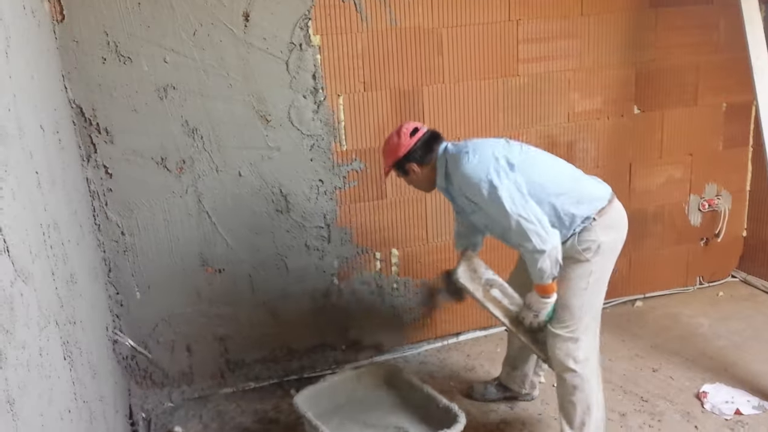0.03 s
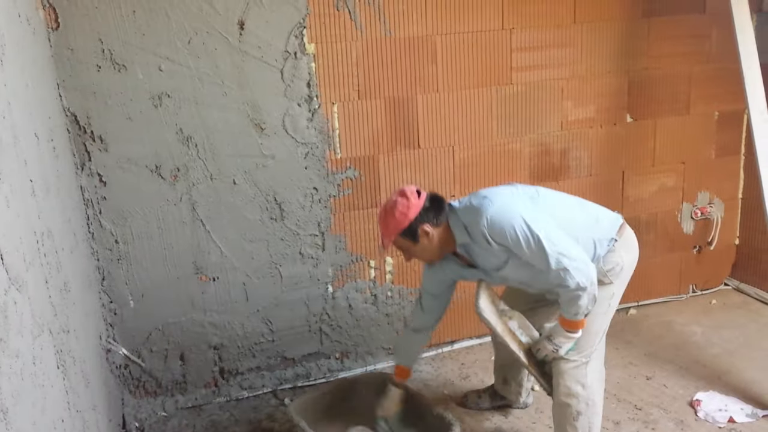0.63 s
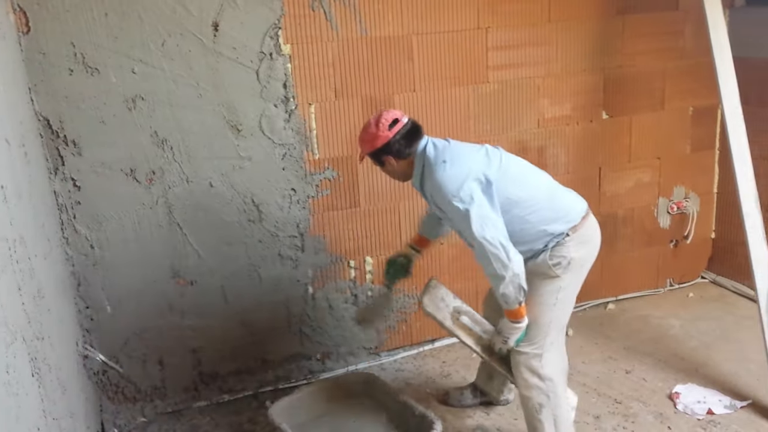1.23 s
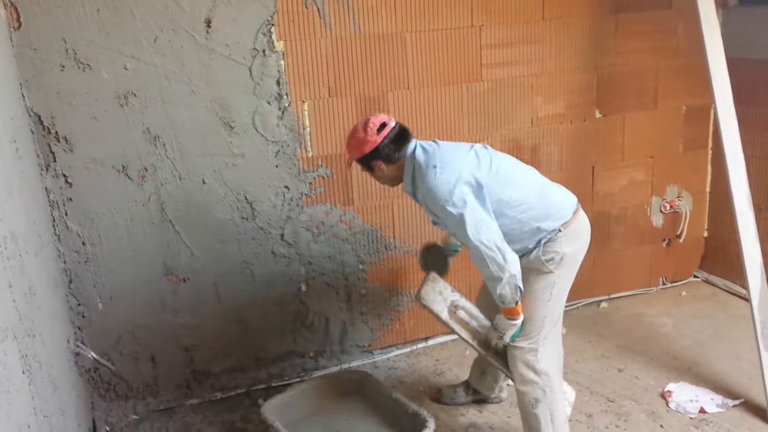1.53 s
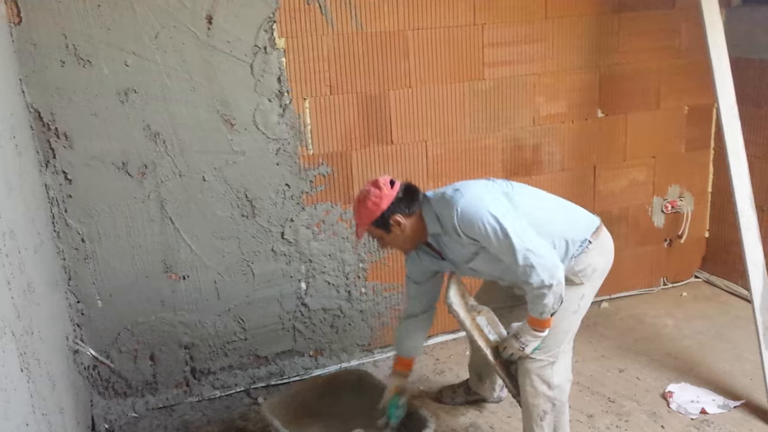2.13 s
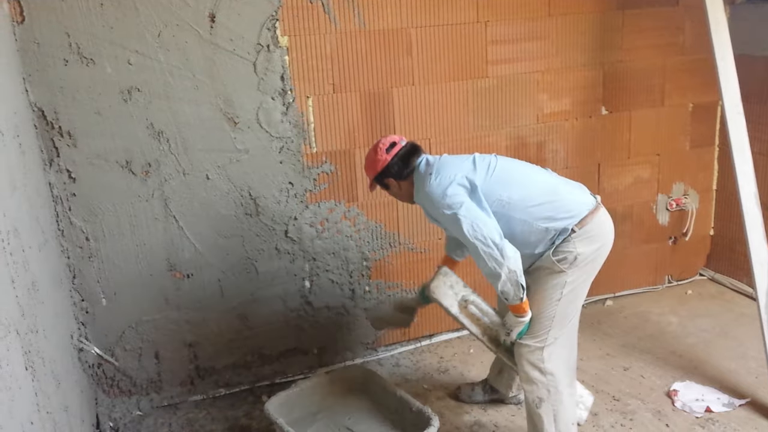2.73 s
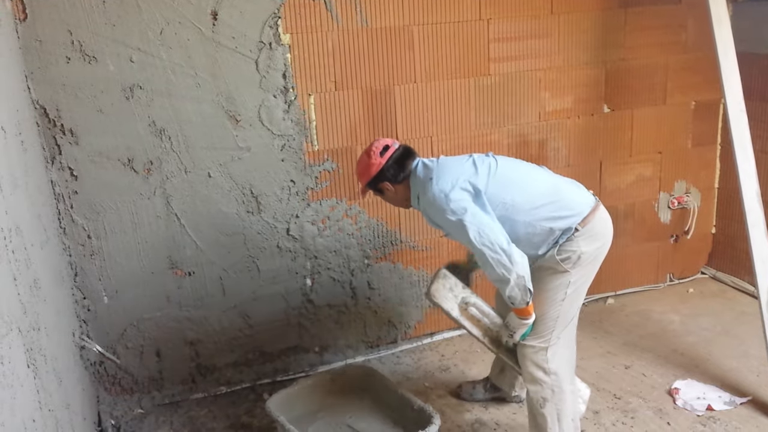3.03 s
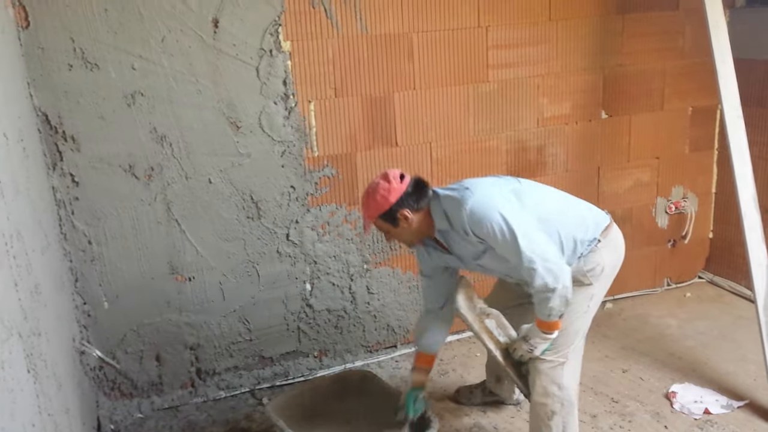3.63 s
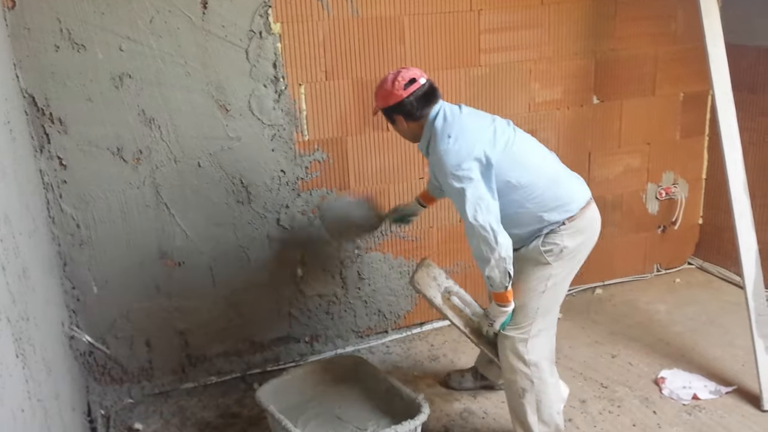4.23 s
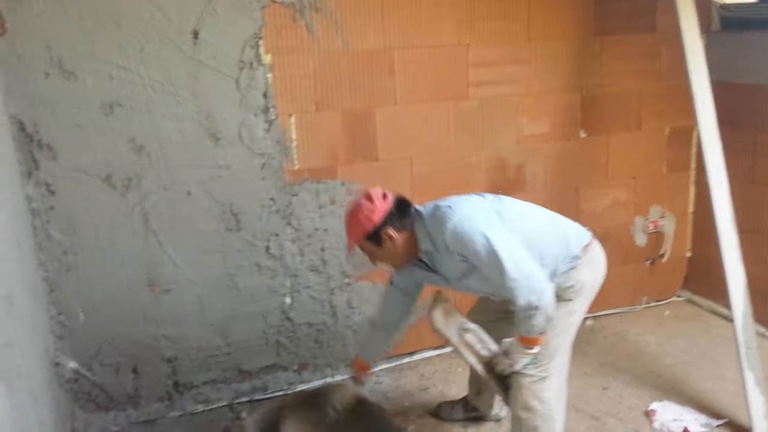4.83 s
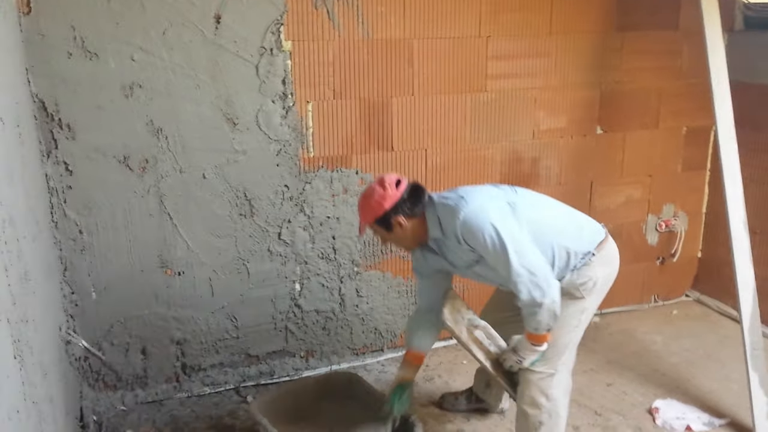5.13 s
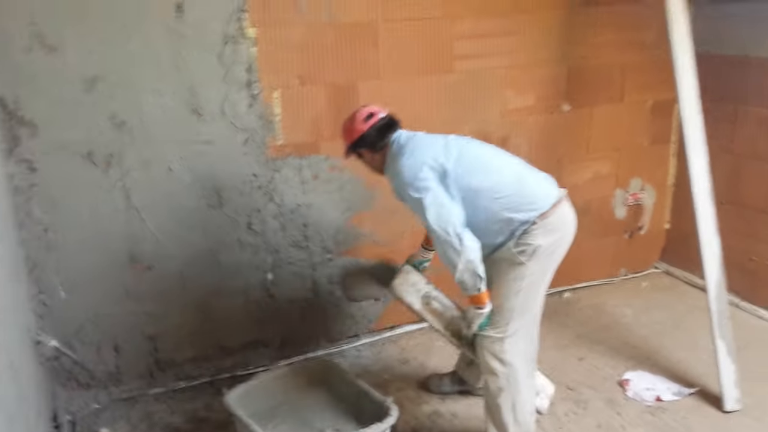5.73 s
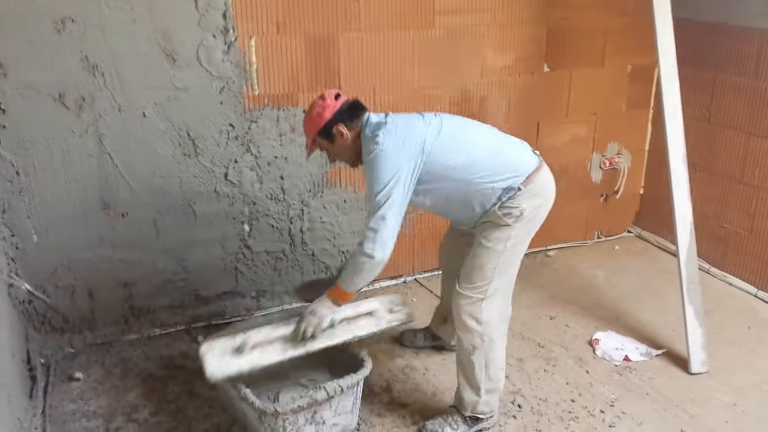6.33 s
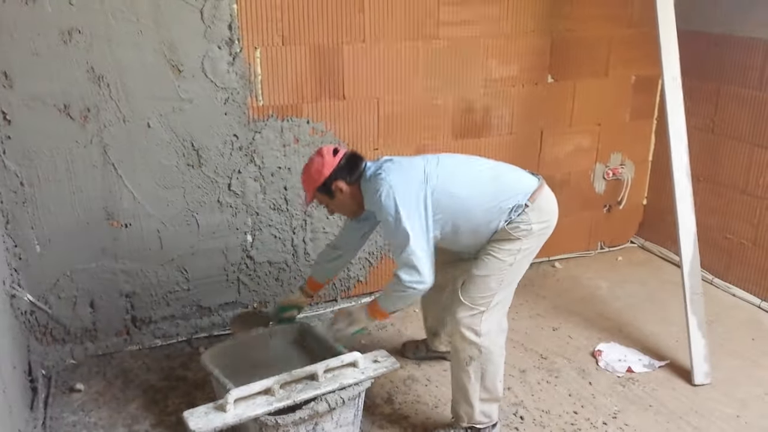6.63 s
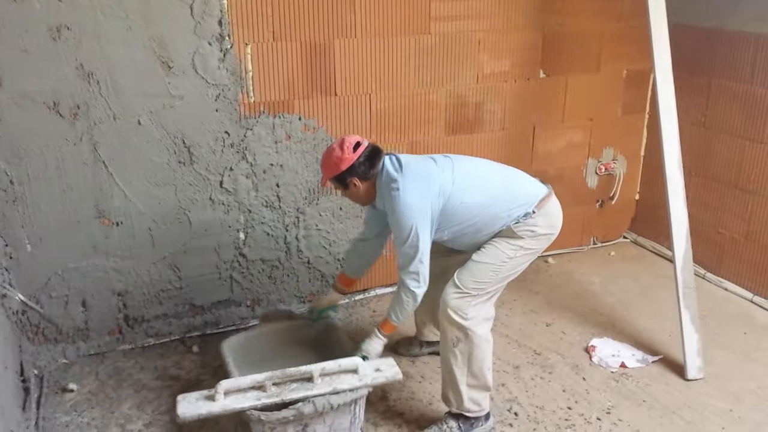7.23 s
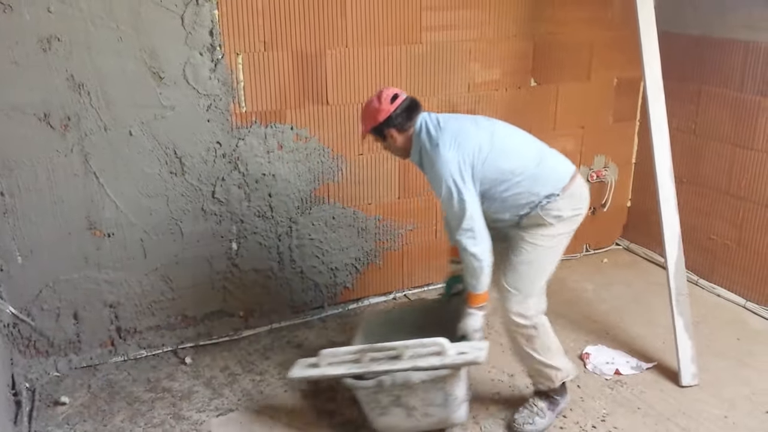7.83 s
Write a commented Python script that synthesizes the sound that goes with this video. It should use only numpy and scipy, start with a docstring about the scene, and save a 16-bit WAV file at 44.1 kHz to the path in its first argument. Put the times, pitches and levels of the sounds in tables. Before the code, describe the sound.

In a bare room with a short echo, a trowel rasps through sandy mortar in a plastic tub, ticking and bumping, then slaps a load onto a masonry wall. Five wet, grainy splats come about a second and a half apart. The throwing stops and the tub scrapes across the gritty floor, rumbling louder with brief squeaks. A few handling pops touch the hand-held microphone.

```python
"""Five trowel loads of wet mortar splat on a brick wall in a bare, echoing room.
Each impact is a shower of grains over the thud of the flattening mass and a boom of the wall.
Between throws the trowel scoops, scrapes and knocks in a plastic tub, rasping by stick-slip friction;
at the end the tub is dragged over the gritty floor, which drives its walls and base into resonance.
A hand-held stereo microphone, muffled at its left port, adds a few handling pops."""
import sys
import numpy as np
from scipy import signal
from scipy.fft import rfft, irfft
from scipy.io import wavfile

SR = 44100
rng = np.random.default_rng(int(sys.argv[2]) if len(sys.argv) > 2 else 0)


def to_wav(s):
    """Save 16-bit WAV."""
    ch = np.atleast_2d(s).T  # columns
    pcm = np.round(np.clip(ch, -1, 1) * 32767)  # PCM
    wavfile.write(sys.argv[1], SR, pcm.astype(np.int16))


N = 357210
TIME = np.arange(N) / SR


def amp(db):
    """Amplitude ratio of a level; table levels are relative, ahead of each source's overall gain."""
    return 10 ** (np.asarray(db) / 20)


def unit_rms(x):
    """Normalisation to an rms of 1."""
    return x / np.sqrt(np.mean(x ** 2) + 1e-20)


def at_hz(points, hz):
    """Interpolation on a log-frequency axis."""
    f, value = np.transpose(points)
    return np.interp(np.log(hz + 1), np.log(f + 1), value)


def add(mix, s, sound):
    """Superposition of a sound starting at time s."""
    part = mix[max(round(s * SR), 0):][:len(sound)]
    part += sound[:len(part)]


def envelope(rows, fade_s=0.06):
    """Gain along a dB curve, with exponential decay beyond its ends."""
    s, db = np.transpose(rows)
    outside = np.maximum(s[0] - TIME, 0) + np.maximum(TIME - s[-1], 0)
    return amp(np.interp(TIME, s, db)) * np.exp(-outside / fade_s)


def colour(x, spectrum, tilt=0, size=2048):
    """Minimum-phase filtering at unit energy; tilt [dB/octave] pivots about 3 kHz."""
    hz = abs(np.fft.fftfreq(size, 1 / SR))
    log_gain = np.log(amp(at_hz(spectrum, hz) + tilt * np.log2(np.maximum(hz, 500) / 3000)))
    taps = np.fft.ifft(np.exp(np.conj(signal.hilbert(log_gain)))).real
    return signal.fftconvolve(x, taps / np.linalg.norm(taps))[:len(x)]


def grit(count, per_s, spread_db):
    """Shot noise of sand grains: random clicks, most small and a few large."""
    size = amp(spread_db * np.minimum(rng.exponential(1, count), 4))
    return unit_rms(size * rng.choice([-1, 1], count) * (rng.random(count) < per_s / SR))


def slips(rate_hz, depth_db):
    """Random amplitude modulation, as of sticking and slipping."""
    knots = np.arange(0, N / SR + 1, 1 / rate_hz)
    grip = np.clip(rng.standard_normal(len(knots)), -2, 2)
    return unit_rms(amp(depth_db * np.interp(TIME, knots, grip)))


def resonate(x, modes):
    """Modal superposition: one force drives parallel resonances."""
    return unit_rms(sum(amp(db) * signal.lfilter(*signal.iirpeak(hz, hz / width, SR), x)
                        for hz, width, db in modes))


def bursts(rows):
    """Transient excitation: each decaying noise burst drives its own passband."""
    out, t = np.zeros(N), np.arange(SR // 3) / SR
    for s, db, hz, width, fall in rows:
        low = np.hypot(hz, width / 2) - width / 2
        band = signal.butter(2, [low, low + width], "band", fs=SR, output="sos")
        push = signal.sosfilt(band, rng.standard_normal(len(t)) * np.exp(-t / fall))
        add(out, s, amp(db) * unit_rms(push) * np.sqrt(fall / t[-1]))
    return out


# Reverberation of the room: (frequency [Hz], time to fall 60 dB [s])
ROOM_T60 = [(100, 0.49), (320, 0.45), (900, 0.5), (2500, 0.51), (5500, 0.45), (10000, 0.4), (15000, 0.15)]
# Likeness of the two ports: (frequency [Hz], coherence [0-1])
COHERENCE = [(270, 0.98), (450, 0.75), (740, 0.7), (1220, 0.11), (2000, 0)]

def diffuse(pair, dying=False):
    """Diffuse field: the ports agree only at long wavelengths; a dying tail decays band by band."""
    hz, t, (left, other) = signal.stft(pair, SR, nperseg=512)
    same = np.clip(at_hz(COHERENCE, hz), 0, 1)[:, None]
    spectra = np.array([left, same * left + np.sqrt(1 - same ** 2) * other])
    if dying:
        spectra *= np.exp(-np.log(1000) * t / at_hz(ROOM_T60, hz)[:, None])
    return signal.istft(spectra, SR, nperseg=512)[1][:, :pair.shape[1]]


def room(x, direct_db, places=3):
    """Reverberation: direct sound plus reflections, cycling through one echo pattern per source place."""
    out, shape = np.zeros((2, N)), (2, SR * 3 // 4)
    place = (TIME * 30).astype(int) % places
    ease = np.hanning(257) / 128
    for k in range(places):
        reflections = rng.choice([-1., 1.], shape) * (rng.random(shape) < 2500 / SR)
        echo = diffuse(reflections, dying=True)
        echo /= np.sqrt((echo ** 2).sum(1, keepdims=True))
        echo[[0, 1], rng.integers(0, 10, 2)] += amp(direct_db)
        share = x * signal.oaconvolve(place == k, ease, "same")
        out += signal.oaconvolve(share[None], echo, axes=1)[:, :N]
    return out / np.hypot(1, amp(direct_db))


# Background spectrum: (frequency [Hz], level [dB])
AIR_SPECTRUM = [(25, -33), (130, 2.5), (300, -5), (700, -15), (2500, -27), (7000, -29), (15500, -32)]

def air(floor_db=-57):
    """Ambient noise: the building's faint, steady diffuse field."""
    pair = np.array([colour(noise, AIR_SPECTRUM) for noise in rng.standard_normal((2, N))])
    return amp(floor_db) * diffuse(pair)


# Handling pops at the left port: (time [s], level [dB])
HANDLING_POPS = [(1.7009, 9), (1.882, -9.5), (2.2526, -6), (2.7652, 0), (3.3506, -6.5), (4.3057, -7)]
# Air puffs crossing both ports: (time [s], level [dB])
AIR_PUFFS = [(6.1423, -9.5), (6.32, -11), (6.38, -8)]

def pops(rise_s=0.000099, pop_hz=95, puff_hz=290, pop_fall_s=0.0025, puff_fall_s=0.0016, lag_s=0.00168):
    """Damped pressure steps at the ports swing back once; a puff reaches the right port later."""
    out, t = np.zeros((2, N)), np.arange(SR // 20) / SR
    step = 1 - np.exp(-t / rise_s)
    pop = step * np.exp(-t / pop_fall_s) * np.cos(2 * np.pi * pop_hz * t + 0.76)
    puff = step * np.exp(-t / puff_fall_s) * np.cos(2 * np.pi * puff_hz * t)
    for s, db in HANDLING_POPS:
        add(out[0], s, amp(db) * pop)
    for s, db in AIR_PUFFS:
        for port in range(2):
            add(out[port], s + port * lag_s, amp(db) * puff)
    return amp(-3.5) * out


def stirring(end_s=6.4):
    """Granular noise: wet mix shifts faintly and crumbles off the tools until the work stops."""
    sand = colour(grit(N, 3000, 4.4), RASP_SPECTRUM, tilt=1.5)
    paste = amp(-3) * colour(grit(N, 1200, 3.0), CHURN_SPECTRUM)
    stray_grains = amp(-55.5) * colour(grit(N, 13, 3.0), SPLAT_SPECTRUM, tilt=2)
    mix = amp(-52) * (sand + paste) * slips(rate_hz=14, depth_db=2.5) + stray_grains
    return room(mix * (TIME < end_s), direct_db=-6.5, places=1)


# Pull on the tub: (time [s], effort [dB])
PULL = [(6.52, -49), (6.532, -38.5), (6.656, -30), (6.884, -43.5), (7.008, -30.5), (7.07, -32),
        (7.342, -21.5), (7.602, -22.5), (7.958, -16.5), (8.1, -21.5)]
# Sand grinding under the tub: (frequency [Hz], level [dB])
GRIND_SPECTRUM = [(100, -20.5), (400, 1), (650, -5.5), (1030, -1.5), (1400, -6), (1900, -1.5), (2450, 3.5),
                  (2800, -1.5), (3300, -3.5), (4000, -7), (4650, -1.5), (5600, -9), (8000, -8.5),
                  (12500, -14), (15500, -20)]
# Modes of the loaded tub's walls and base: (frequency [Hz], bandwidth [Hz], level [dB])
WALL_MODES = [(206, 6.8, -8), (266, 35, 0), (290, 15.5, -1), (361, 53, -6), (460, 32, -5.5)]
BASE_MODES = [(115.4, 12, 0)]

def drag(full_pull_db=-18.5, catch_per_s=35, catch_fall_s=0.0021, rim_hz=2420, rim_width_hz=200):
    """Forced vibration: sliding friction shakes the tub; larger grains crack and set its rim squealing."""
    effort = envelope(PULL) / amp(full_pull_db)
    judder = slips(rate_hz=90, depth_db=1.14) * slips(rate_hz=140, depth_db=-2.05)
    large_grains = abs(grit(N, catch_per_s, 1.7))
    catches = unit_rms(signal.lfilter([1], [1, -np.exp(-1 / (catch_fall_s * SR))], large_grains))
    pair = []
    for port in range(2):
        cracks = amp(-30.5) * catches * rng.standard_normal(N)
        sand = effort * colour(amp(-15.5) * grit(N, 10000, 2.4) * judder + cracks, GRIND_SPECTRUM)
        rim = amp(-28) * effort * resonate(cracks, [(rim_hz, rim_width_hz, 0)])
        shake = grit(N, 1500, 1.9) * judder
        wall_force = colour(shake, [(80, -23), (190, 1.5), (480, -5.5), (1000, -23)])
        base_force = colour(shake, [(150, 7), (500, -34)])
        # walls and base grow faster with effort than the grinding does
        walls = amp(-20.5) * effort ** 1.22 * resonate(wall_force, WALL_MODES)
        base = amp(-30.5) * effort ** 1.25 * resonate(base_force, BASE_MODES)
        pair.append(sand + rim + walls + base)
    return diffuse(np.array(pair))


# Blade and tub rim catching on grit: (time [s], level [dB], added tilt [dB/octave])
GRIT_TICKS = [(0.641, -25, 2), (0.787, -23.5, -7.5), (2.020, -20, 5.5), (2.144, -26, -6.5),
              (2.236, -26.5, -0.5), (2.917, -15, -1.5), (3.484, -17.5, 1.5), (3.536, -20.5, -2.5),
              (3.731, -23, 6), (4.203, -28.5, 2.5), (4.326, -31, -1), (4.941, -15, 2.5), (5.007, -15, 2),
              (5.689, -11.5, 2), (5.932, -11, -1), (6.638, -24, 0), (6.908, -26, -12), (6.985, -25.5, -9.5)]

def ticks(rise_s=0.0008, fall_s=0.0034, skid_db=-14, skid_fall_s=0.019, base_tilt=2):
    """Brittle fracture: grains crack under an edge, which skids on a little."""
    out, t = np.zeros(N), np.arange(SR // 12) / SR
    crush = np.minimum(t / rise_s, 1) * (np.exp(-t / fall_s) + amp(skid_db) * np.exp(-t / skid_fall_s))
    for s, db, tilt in GRIT_TICKS:
        crack = rng.standard_normal(len(t)) * crush
        add(out, s, amp(db) * colour(crack, SPLAT_SPECTRUM, base_tilt + tilt))
    return amp(4.8) * room(out, direct_db=-1.5, places=2)


# Hard blows on the tub: (time [s], level [dB])
TUB_BLOWS = [(1.054, -23)]
# Modes of the struck tub: (frequency [Hz], bandwidth [Hz], level [dB])
STRUCK_MODES = [(332, 610, 0.5), (785, 170, -2), (907, 130, 8), (1130, 180, 2.5), (1670, 520, -7),
                (2070, 200, -4), (2800, 260, -18)]

def knocks(contact_s=0.0013, crack_db=-17, rattle_db=-14, rattle_fall_s=0.068):
    """Impact excitation: a trowel blow and the rattling load drive the tub's heavily damped modes."""
    out, t = np.zeros(N), np.arange(SR // 4) / SR
    decay = np.exp(-t / contact_s) + amp(rattle_db) * np.exp(-t / rattle_fall_s)
    blow = rng.standard_normal(len(t)) * decay
    body = resonate(colour(blow, [(60, -7.0), (300, 1), (2500, -1), (7000, -13.5)]), STRUCK_MODES)
    crack = amp(crack_db) * unit_rms(colour(blow, SPLAT_SPECTRUM, tilt=-1.5))
    for s, db in TUB_BLOWS:
        add(out, s, amp(db) * (body + crack))
    return room(out, direct_db=-13.5, places=1)


# Brief screeches and blade rings: (time [s], level [dB], frequency [Hz], decay time [s])
EDGE_RINGS = [(1.858, -28.5, 2290, 0.016), (2.144, -26, 2270, 0.0068), (5.688, -26, 4700, 0.003),
              (5.953, -22.5, 2540, 0.039), (6.53, -41, 1950, .04), (6.637, -34, 2050, 0.054),
              (7.335, -28, 2570, .025), (8.019, -20.5, 2380, .025)]

def chatter(width_hz=490):
    """Narrow-band vibration: a tool edge or the tub rim screeches in friction, or the blade rings after a clink
    or a throw."""
    return amp(1.0) * bursts([(s, db, hz, width_hz, fall) for s, db, hz, fall in EDGE_RINGS])


# Strokes through the mix: (time [s], duration [s], build-up share [0-1], level [dB], tilt [dB/octave])
TROWEL_STROKES = [(0, 0.13, 0, -27.5, 0), (.43, 0.37, 0, -42, .5), (1.187, 0.24, 0.5, -39.5, -2.7),
                  (1.835, 0.071, 0.17, -33, 1), (1.919, 0.23, .3, -34, 2.5), (2.321, 0.18, 0.16, -42.5, 0),
                  (2.466, .055, 0.05, -28, -3), (2.581, 0.35, 0, -42.5, 3), (3.507, 0.26, .05, -45.5, 0),
                  (3.719, 0.15, 0, -40.5, 2.5), (3.859, 0.21, 0.19, -39, -2),
                  (4.062, 0.19, 0.02, -45.5, -2), (4.756, 0.18, .04, -30.5, -0.6),
                  (5.008, 0.081, 0.12, -27, -6.5), (5.314, 0.17, 0.59, -25.5, -.5),
                  (5.486, 0.11, 0.1, -36, 2), (5.587, 0.064, 0, -28.5, 2), (6.157, 0.153, 0.27, -46, 5.5)]
# Rasping sand and churning paste: (frequency [Hz], level [dB])
RASP_SPECTRUM = [(500, -39), (1400, -10.5), (2000, -3), (2550, 0.5), (3400, -5.5), (4900, -3.5), (6500, -8),
                 (10000, -13.5), (15500, -18.5)]
CHURN_SPECTRUM = [(50, -10.5), (170, 2.5), (300, 3.5), (550, 2), (680, -0.5), (950, 2.5), (1300, 1),
                  (2200, -19)]

def trowel(per_s=9000, spread_db=4.0, release_s=0.012, swing_s=0.092):
    """Stick-slip friction: the blade rasps over sand in jerks while wet mix churns around it."""
    out, t = np.zeros(N), np.arange(SR // 2) / SR
    jerks = slips(rate_hz=75, depth_db=3.1)
    # one more stroke before each throw: the load slides along the swinging blade
    swings = [(s - swing_s, swing_s, 0.049, -39.5, -1.5) for s, *_ in MORTAR_THROWS if s > swing_s]
    for s, length, build, db, tilt in TROWEL_STROKES + swings:
        swell = np.minimum(t / max(build * length, 1 / SR), 1) ** 2
        release = np.clip((length - t) / release_s, 0, 1)
        force = swell * release * jerks[int(s * SR):][:len(t)]
        sand = colour(grit(len(t), per_s, spread_db) * force, RASP_SPECTRUM, tilt)
        paste = colour(grit(len(t), per_s / 4, spread_db) * force, CHURN_SPECTRUM)
        churn_db = -7.5 - 0.5 * tilt  # a blade deep in the mix is duller and churns more
        add(out, s, amp(db) * (sand + amp(churn_db) * paste))
    return amp(3.5) * room(out + chatter(), direct_db=-1.0)


# Thumps of the tub and its mix: (time [s], level [dB], frequency [Hz], decay time [s])
TUB_THUMPS = [(.075, -25.5, 154, 0.025), (.722, -32, 237, 0.016), (.786, -21.5, 310, 0.01),
              (2.109, -14, 230, 0.004), (2.133, -24, 225, 0.014), (2.882, -30, 193, 0.035),
              (3.429, -35.5, 377, 0.024), (3.537, -25.5, 217, .013), (4.767, -26, 288, 0.0062),
              (4.868, -27.5, 528, 0.012), (5.006, -17, 190, 0.0085), (5.596, -29.5, 540, 0.053),
              (5.653, -29, 86, 0.0089), (5.704, -32, 243, 0.066), (6.645, -33, 119, .02),
              (6.984, -19.5, 258, 0.019), (7.571, -20.5, 114, 0.05)]

def thuds(lag_s=0.00606, thud_fall_s=0.04, boom_hz=106, boom_width_hz=59, boom_fall_s=0.073):
    """Air displacement: soft mass thumps in the tub or flattens on the wall, which booms under it."""
    thump_width, thud_width = 0.39, 0.48  # bandwidth over centre frequency
    rows = [(s, db, hz, thump_width * hz, fall) for s, db, hz, fall in TUB_THUMPS]
    for start, _, delay, _, _, thud_db, hz, boom_db in MORTAR_THROWS:
        s = start + delay + lag_s
        rows.append((s, thud_db, hz, thud_width * hz, thud_fall_s))
        rows.append((s, boom_db, boom_hz, boom_width_hz, boom_fall_s))
    return amp(-1.5) * room(bursts(rows), direct_db=3.5)


# Grain impacts: (frequency [Hz], level [dB])
SPLAT_SPECTRUM = [(60, -21), (200, -7), (550, -6), (950, 0.5), (1450, -5.5), (2000, -1), (2550, 2),
                  (3400, -3.5), (4800, -1.5), (6500, -7), (10000, -13.5), (15500, -17)]
# Loads hitting the wall: (time [s], spray level [dB], mass delay [s], mass level [dB],
# mass tilt [dB/octave], thud level [dB], thud frequency [Hz], boom level [dB])
MORTAR_THROWS = [(0.118, -21, 0.025, -17.5, -1.5, -20.5, 188, -32),
                 (1.514, -24.5, .024, -17, 0.57, -38, 380, -52),
                 (2.918, -21.5, .043, -20, -1, -13.5, 350, -34),
                 (4.387, -30.5, .017, -16, 0.84, -29, 444, -30.5),
                 (5.883, -21, .04, -17.5, 1.4, -46, 405, -46)]

def splats(per_s=7000, spread_db=3.0, dulling_tilt=1.5, crumbs_db=-28, crumbs_fall_s=0.29):
    """Inelastic impact: spray, then mass, land as grain showers that dull as they spread; crumbs follow."""
    spray_rise_s, spray_fall_s, spray_tilt = 0.0027, 0.025, 2.1
    mass_rise_s, mass_fall_s = 0.0058, 0.043
    out, t = np.zeros(N), np.arange(SR // 2) / SR
    for start, spray_db, delay, mass_db, mass_tilt, *_ in MORTAR_THROWS:
        spray = (start, spray_db, spray_rise_s, spray_fall_s, spray_tilt)
        mass = (start + delay, mass_db, mass_rise_s, mass_fall_s, mass_tilt)
        for s, db, rise, fall, tilt in (spray, mass):
            landing = np.minimum(t / rise, 1) * np.exp(-np.maximum(t - rise, 0) / fall)
            shower = grit(len(t), per_s, spread_db) * landing
            crumbs = amp(crumbs_db) * grit(len(t), 500, 7.4) * np.exp(-t / crumbs_fall_s)
            fresh = np.exp(-t / (rise + fall))
            bright = colour(shower * fresh + crumbs, SPLAT_SPECTRUM, tilt + dulling_tilt)
            dull = colour(shower * (1 - fresh), SPLAT_SPECTRUM, tilt - dulling_tilt)
            add(out, s, amp(db) * (bright + dull))
    return amp(8.0) * room(out, direct_db=-4.5)


def scene():
    """Linear superposition of all sources at the two ports."""
    return splats() + thuds() + ticks() + knocks() + trowel() + stirring() + drag() + pops() + air()


# Shading of the ports: (frequency [Hz], left minus right level [dB])
PORT_BALANCE = [(60, -2), (770, -2), (1170, 0.5), (1790, 4.5), (2740, 6), (4190, 2), (6410, -2.5),
                (9810, -16), (15000, -21)]

def record(dry):
    """Transducer response: the left port loses high treble, peaks saturate, and the band is limited."""
    ratio = amp(at_hz(PORT_BALANCE, np.fft.rfftfreq(N, 1 / SR)))
    port_gains = np.array([ratio, np.ones_like(ratio)]) * np.sqrt(2 / (1 + ratio ** 2))
    shaded = irfft(rfft(dry) * port_gains, N)
    saturated = shaded / (1 + shaded ** 6) ** (1 / 6)
    lowpass = signal.firwin(255, cutoff=15800, window=("kaiser", 9), fs=SR)
    return signal.oaconvolve(saturated, lowpass[None], "same")


dry = scene()
out = record(dry)
to_wav(out)
```